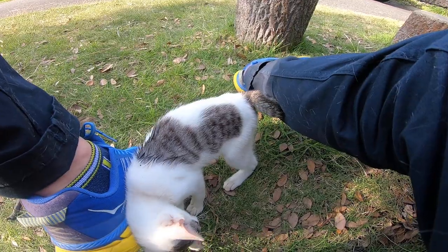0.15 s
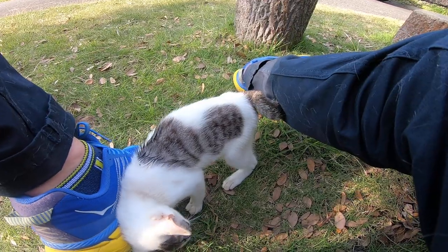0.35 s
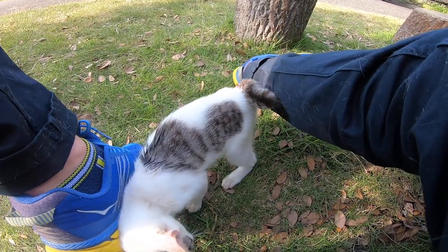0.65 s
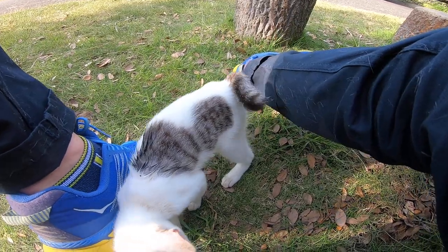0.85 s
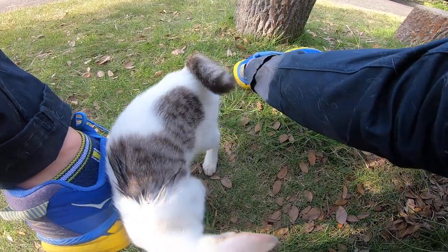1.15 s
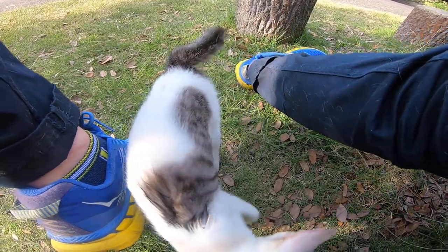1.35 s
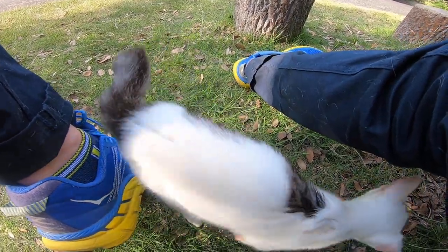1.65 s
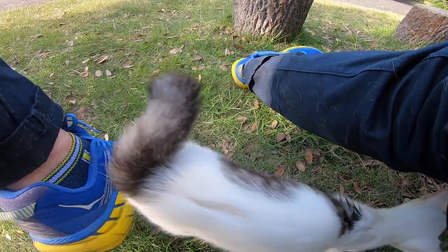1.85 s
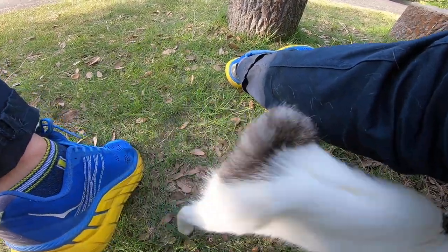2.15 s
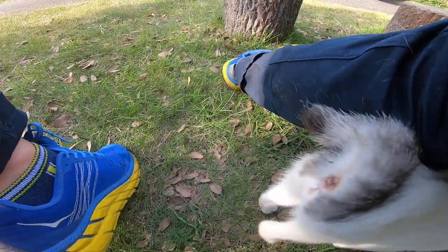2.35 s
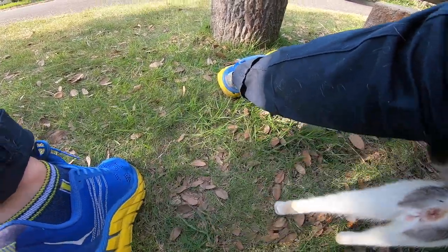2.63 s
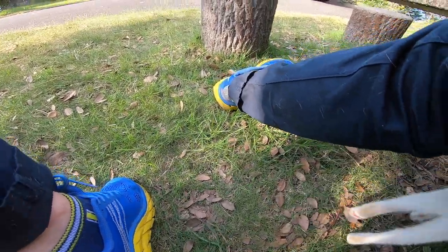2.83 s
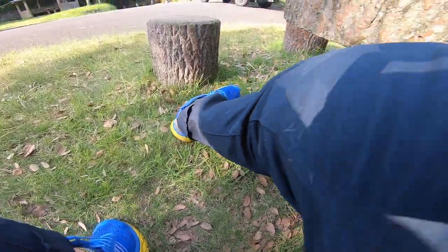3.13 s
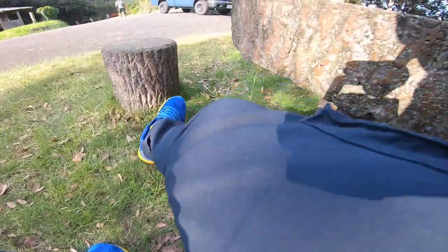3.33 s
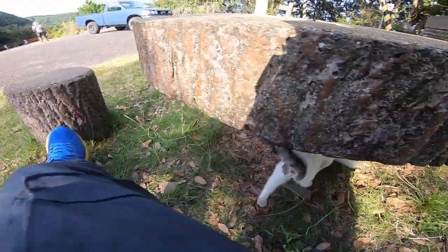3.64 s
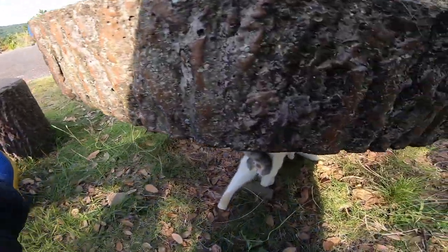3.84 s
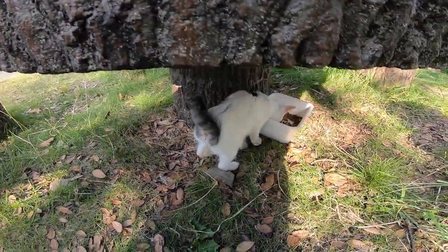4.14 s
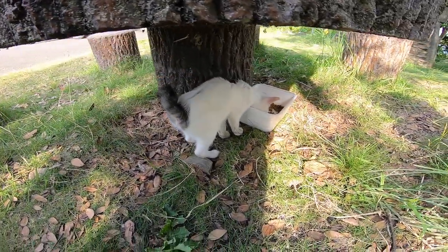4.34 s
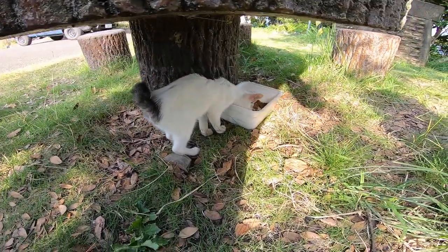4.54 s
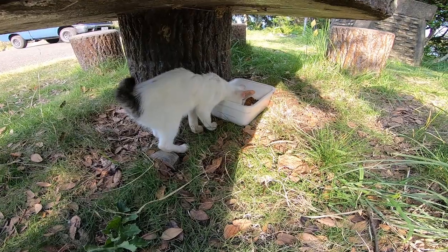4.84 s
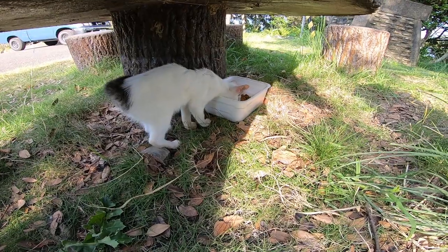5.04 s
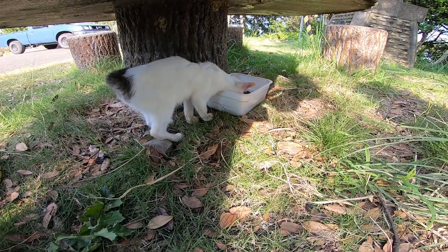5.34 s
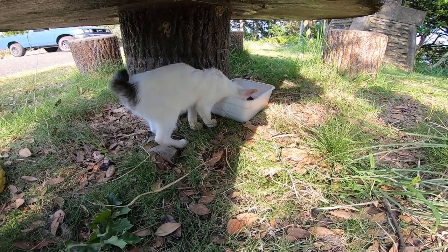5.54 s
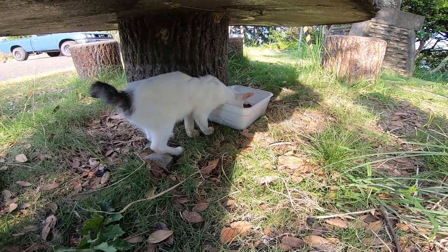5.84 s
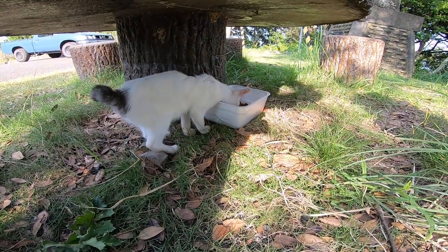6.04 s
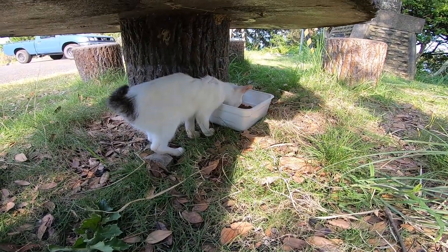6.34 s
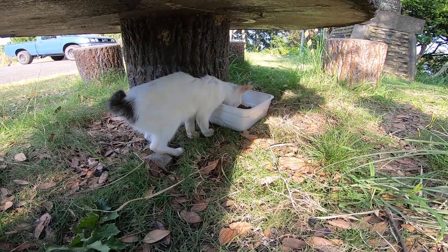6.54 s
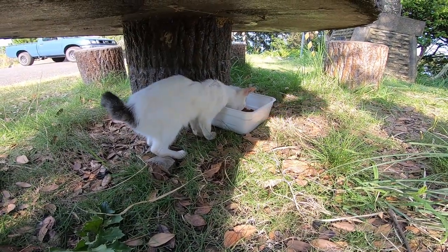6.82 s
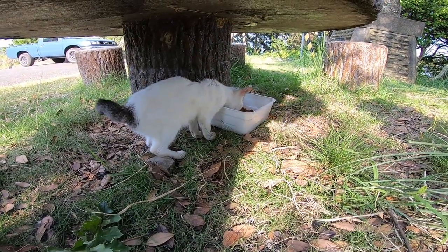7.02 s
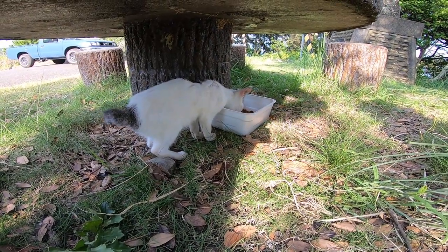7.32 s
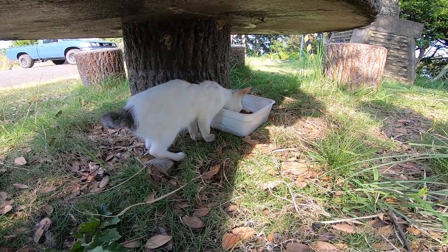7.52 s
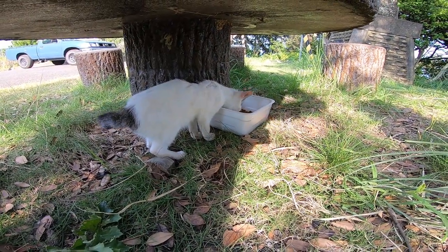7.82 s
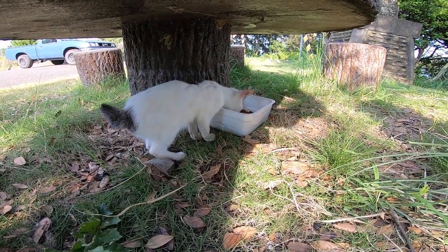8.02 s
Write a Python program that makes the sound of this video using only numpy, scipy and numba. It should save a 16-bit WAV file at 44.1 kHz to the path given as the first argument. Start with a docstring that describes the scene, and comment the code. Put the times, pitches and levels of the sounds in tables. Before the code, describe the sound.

Outdoor stereo ambience from a small moving camera close to the grass: a bright, dense cicada hiss dips slightly, then grows clearly louder from three to four seconds as the camera turns. A closer cicada pulses about five times a second on the left, with steady whistling singers that later fade or stop. Soft leaf rustle, sparse dry snaps, brief low wind bumps and faint distant traffic rumble stay underneath.

```python
"""Cicadas in the trees of a park, heard by a small camera near the ground that turns towards them.
From the start a crowd hisses high up, lower cicadas sing, and wind and far traffic rumble under rustling leaves.
A far bird chirps at once; from 1.5 s dry leaves snap under a cat's paws. Near 3 s a cicada whistles, then
a near one clicks and throbs, and a high one whistles from 3.5 to 5.3 s. The first whistle stops at 6.3 s.
Noise and click trains pass through spectra and resonances; sines make the bird and the rings of the snaps."""
import sys
import numpy as np
from scipy import signal
from scipy.fft import rfft, irfft, next_fast_len
from scipy.io import wavfile
from scipy.ndimage import uniform_filter1d
from numba import njit

SR = 44100
rng = np.random.default_rng(int(sys.argv[2]) if len(sys.argv) > 2 else 0)


def dump_mix(stems):
    """Bounce the given channels to the path in sys.argv[1] as a 16-bit WAV at rate SR."""
    frames = np.atleast_2d(stems).T  # one column per channel
    limited = np.clip(frames, -1, 1)  # hard clip at full scale
    pcm = np.round(limited * 32767).astype(np.int16)
    wavfile.write(sys.argv[1], SR, pcm)


N = 360498  # samples

# Crowd of high cicadas as the camera turns:
# t/s, level/dB, left minus right/dB, belly resonance f/Hz, left-right likeness (-1 to 1)
CROWD_PATH = [(0, -36.3, -1, 9000, -0.26), (1, -37.5, 0, 8750, -0.21), (1.4, -38, 0.5, 8570, -0.12),
              (2.15, -38.5, 1, 8650, -0.16), (2.75, -40.3, 2, 8400, -0.17), (3.2, -39.5, 0, 8600, -.1),
              (3.6, -36, -1, 8500, 0), (4, -32.5, -2, 8300, .15), (4.5, -33, -0.5, 8240, .15),
              (5.2, -33.5, -1, 8200, 0.17), (6.1, -32.5, -1.5, 8300, 0.21), (6.45, -31.5, -1.7, 8850, .1),
              (7.3, -31.5, -1.2, 9200, 0.072), (8.17, -31.5, -1, 9000, .1)]


def undb(db):
    """Gain of a level in dB."""
    return 10 ** (np.asarray(db) / 20)


def unit(x):
    """Scale to rms 1, over both channels together."""
    return x / np.sqrt(np.mean(x ** 2))


def curves(table):
    """Columns of a table, drawn as straight lines from sample to sample along its times."""
    seconds, *columns = np.transpose(table)
    t = np.arange(N) / SR
    return [np.interp(t, seconds, column) for column in columns]


def place(db, pan_db):
    """Left and right gain; pan_db is left minus right."""
    return undb(db + np.outer([1, -1], pan_db) / 2)


def colour(x, tone):
    """Shape by a spectrum of f/Hz, level/dB, straight over log frequency; the result has rms 1."""
    size = next_fast_len(N)
    log_hz = np.log(np.arange(size // 2 + 1) * SR / size + 1e-9)
    at_hz, db = np.transpose(tone)
    gain = undb(np.interp(log_hz, np.log(at_hz), db, left=-90, right=-90))
    return unit(irfft(rfft(x, size) * gain, size)[..., :N])


def pair(alike):
    """Stereo noise with the given left-right correlation, mixed from a middle and a side noise."""
    mid, side = rng.standard_normal((2, N))
    alike = np.clip(alike, -1, 1)
    opposed = side * np.array([[1], [-1]])
    return np.sqrt((1 + alike) / 2) * mid + np.sqrt((1 - alike) / 2) * opposed


@njit
def svf(x, hz, width):
    """State-variable band-pass whose centre may move, gain 1 at the centre."""
    y, band, low = np.empty(len(x)), 0., 0.
    for i in range(len(x)):
        g, damping = np.tan(np.pi * hz[i] / SR), width / hz[i]
        v = (band + g * (x[i] - low)) / (1 + g * (g + damping))
        band, low, y[i] = 2 * v - band, low + 2 * g * v, damping * v
    return y


def ring(x, modes, shift=1):
    """Both channels through resonances, each passed twice; neighbours swing in opposite sense."""
    factor = np.ones(N) * shift
    channels = []
    for channel in x:
        total = np.zeros(N)
        for k, (hz, width, db) in enumerate(modes):
            once = svf(channel, hz * factor, 1. * width)
            twice = svf(once, hz * factor, 1. * width)
            total += (-1) ** k * undb(db) * twice
        channels.append(total)
    return unit(np.array(channels))


def walk(rate):
    """Random levels held 1 / rate s and smoothed twice over that time; rms 1."""
    hold = int(SR / rate)
    steps = np.repeat(rng.standard_normal(N // hold + 1), hold)
    return unit(uniform_filter1d(uniform_filter1d(steps, hold), hold)[:N])


def cycle(rate, wobble):
    """Phase 0-1 of a click cycle whose rate wobbles by a small share."""
    return np.cumsum(rate * (1 + wobble * walk(30)) / SR) % 1


def clicker(rate, wobble, scatter_db):
    """One-sample clicks, one a cycle, whose sizes scatter in dB."""
    clicks = np.diff(cycle(rate, wobble), prepend=0) < 0
    return clicks * undb(scatter_db * rng.standard_normal(N))


def swells(events):
    """Summed bell-shaped swells in dB."""
    t = np.arange(N) / SR
    return sum(db * np.exp(-.5 * ((t - middle) / spread) ** 2) for middle, db, spread in events)


def whistle(table, rate, modes, wobble, pan_db):
    """Clicks so even that their harmonics stand out as lines, ringing in the body's resonances."""
    clicks = clicker(rate, wobble, scatter_db=5.0)
    # the sound reaches the right port two samples later
    both = np.array([clicks, np.roll(clicks, shift=2)])
    return ring(both, modes) * place(curves(table)[0] + 0.89 * walk(13), pan_db)


def crowd():
    """Far singers blur to a hiss, a few leave thin lines; their belly resonance lifts the middle."""
    # hiss spectrum: f/Hz, relative level/dB
    hiss_tone = [(2650, -69), (4500, -28), (5570, -14.5), (6500, -12), (7140, -4.5), (8620, 1.5),
                 (9270, -1), (9970, -9.5), (11100, -33), (12500, -35), (16200, -65), (22000, -120)]
    # singers that stand out of the crowd: click rate/Hz
    singer_rates = [478, 493, 507, 522, 537, 551]
    db, pan_db, belly_hz, alike = curves(CROWD_PATH)
    singers = [clicker(rate, .0015, scatter_db=0.0) * undb(3.8 * walk(8)) for rate in singer_rates]
    # each comes from its own side, so it reaches the right port at its own lag
    lagged = [np.roll(singer, shift=5 * k - 13) for k, singer in enumerate(singers)]
    lines = np.array([sum(singers), sum(lagged)])
    hiss = colour(pair(alike) + 0.62 * unit(lines), hiss_tone)
    belly = np.array([svf(channel, belly_hz, 2500.0) for channel in hiss])
    return unit(hiss + 0.73 * belly) * place(db + 0.6 * walk(7.5), pan_db)


def sheen():
    """Faint noise band above the chorus: it follows the crowd and gains level with its belly pitch."""
    # resonances: f/Hz, width/Hz, relative level/dB
    sheen_modes = [(13800, 1700, -1), (14650, 1500, 3), (15400, 1500, 1)]
    under_db, db_per_khz, rest_hz = 30, 2, 8500  # below the crowd when its belly is at rest_hz
    right_db = 2.2  # further right than the crowd
    db, pan_db, belly_hz, _ = curves(CROWD_PATH)
    db = db - under_db + db_per_khz * (belly_hz - rest_hz) / 10 ** 3
    return ring(pair(-.1), sheen_modes) * place(db + .9 * walk(6), pan_db - right_db)


def lower_cicadas():
    """Two blurred groups of lower clickers: one train of noise bursts heard through two spectra."""
    # t/s, level/dB, deepest group level/dB
    lower_path = [(0, -53, -71), (.9, -49, -67), (1.6, -49.5, -63.5), (2.2, -46.5, -58), (3, -46, -56.5),
                  (3.6, -47.5, -53.5), (4.1, -50.5, -55), (4.25, -43, -58), (4.45, -45, -57),
                  (5.3, -42.5, -52), (6.26, -46, -49), (6.33, -48, -54), (7.2, -52, -59), (8.17, -48, -58)]
    # spectra of the main and the deepest group: f/Hz, relative level/dB
    lower_tone = [(5200, -38), (5500, -17), (5750, -7.5), (6150, 0), (6500, -3), (7200, -5.5), (8200, -33)]
    deepest_tone = [(4800, -32), (5000, -8.5), (5200, -11), (5400, -2), (5550, -3), (5800, -8.5),
                    (6100, -35)]
    left_db, unlike = 2, 0.27  # they sit left of the crowd and reach the ports less alike
    db, deepest_db = curves(lower_path)
    _, pan_db, _, alike = curves(CROWD_PATH)
    pan_db = pan_db + left_db
    bursts = (.6 + np.exp(-cycle(520., wobble=0.0036) / 0.4)) * pair(alike - unlike)
    group = colour(bursts, lower_tone) * place(db + 1.5 * walk(6.8), pan_db)
    deepest = colour(bursts, deepest_tone) * place(deepest_db + 1.8 * walk(7.6), pan_db)
    return group + deepest


def near_cicada():
    """Each buckling of the ribs is a short noisy burst; a throb swells it and drops the belly's pitch."""
    # t/s, level/dB, belly pitch factor
    near_path = [(0, -58, 1), (3.2, -47.5, 1.01), (3.6, -42, 1.015), (4, -39, 1.01), (6.2, -39.5, 1.009),
                 (6.6, -39.5, 1.02), (8.17, -38.5, 1.018)]
    # belly resonances before the pitch factor: f/Hz, width/Hz, relative level/dB
    near_modes = [(7380, 920, -1), (8180, 600, 3.5), (9110, 1650, -1), (13800, 1800, -27.5)]
    # the belly pumps: middle t/s, swell level/dB, spread/s
    throbs = [(3.48, 5, .025), (3.639, 6.5, .022), (3.806, 4, .017), (3.878, 4, .016), (4.07, 6, 0.024),
              (4.28, 6, .028), (4.467, 6, .034), (4.71, 7, 0.041), (4.884, 7.5, 0.029), (5.067, 5, .031),
              (5.276, 6, .028), (5.47, 5, .031), (5.677, 5.5, .021), (5.845, 7, .022), (6.01, 6, .022),
              (6.23, 6, 0.037), (6.426, 6, .022), (6.69, 5, 0.022), (6.918, 4, 0.033), (7.191, 1.5, .025),
              (7.486, 3.5, .031), (7.704, 4, .019)]
    clicks_hz, pan_db = 497.7, -6
    sag_per_db = .0055  # belly pitch factor lost per dB of swell
    db, pitch = curves(near_path)
    swell_db = swells(throbs)
    bursts = np.exp(-cycle(clicks_hz, wobble=.004) / 0.44) * pair(-0.063)
    return ring(bursts, near_modes, pitch - sag_per_db * swell_db) * place(db + swell_db, pan_db)


def wind():
    """Puffs push low noise into both microphone ports, over a calmer unsteady level."""
    # f/Hz, relative level/dB
    gust_tone = [(12, -9), (22, 3), (35, -5), (50, -2.5), (90, -2), (130, -21)]
    # puffs on the ports: middle t/s, swell level/dB, spread/s
    puffs = [(.42, 11.5, 0.12), (.95, 4, .12), (1.5, 4, .06), (2.11, 11, .07), (2.5, 8, 0.13), (3.0, 4, .1),
             (3.45, 7, .15), (4.0, 6, .1), (5.14, 12, .06), (6.1, 4, .1), (7.1, 1, .07)]
    # between puffs: t/s, level/dB
    calm_path = [(0, -62), (4, -61.5), (8.17, -64.5)]
    db = curves(calm_path)[0] + swells(puffs) + 3.2 * walk(6)
    return colour(pair(0.86), gust_tone) * undb(db)


def traffic():
    """Far traffic: low rumbling noise, nearly alike at both ports."""
    # f/Hz, relative level/dB
    rumble_tone = [(35, -48), (60, -11), (113, -5.5), (162, 0.5), (280, -5.5), (600, -23), (780, -48),
                   (1320, -120)]
    # t/s, level/dB
    rumble_path = [(0, -45), (.8, -46), (1.5, -44.5), (2.5, -46.5), (3.5, -47.5), (4.8, -47.5),
                   (5.6, -47.5), (6.5, -46), (8.17, -46.3)]
    return colour(pair(0.98), rumble_tone) * undb(curves(rumble_path)[0] + 0.97 * walk(10))


def leaves():
    """Leaves rustle all round: a low and a bright band of noise, each flickering in level."""
    # t/s, low rustle level/dB, bright rustle level/dB
    rustle_path = [(0, -54.5, -59.5), (.7, -55.5, -60), (1.15, -54.3, -57), (1.6, -55.5, -60),
                   (2.6, -55, -57.5), (3.2, -54, -57.5), (3.48, -50.5, -55), (4.15, -52, -57),
                   (4.4, -54, -53.5), (4.7, -54, -56.5), (6.2, -55.5, -57), (8.17, -56.5, -58.5)]
    # spectra of the low and the bright rustle: f/Hz, relative level/dB
    low_tone = [(300, 2), (500, -1.5), (700, 0.5), (1000, -0.5), (1500, -2), (2500, -11.5), (4000, -25)]
    bright_tone = [(1000, -19), (1600, -3), (2000, -0.5), (3000, -1.5), (4300, -5), (7000, -11),
                   (11000, -25), (13000, -21), (16000, -24)]
    low_db, bright_db = curves(rustle_path)
    low = colour(pair(0.3), low_tone) * place(low_db + 1.0 * walk(7), -2.3)
    bright = colour(pair(0.5), bright_tone) * place(bright_db + 1.0 * walk(12), -0.9)
    return low + bright


def bird():
    """One faint far chirp: a sine that rises, drops and rises again."""
    # t/s, pitch f/Hz, level/dB
    chirp_path = [(.15, 3600, -83), (.165, 3780, -68), (.195, 3900, -65.5), (.225, 3750, -67),
                  (.247, 2650, -63), (.265, 2850, -65), (.29, 3100, -88)]
    hz, db = curves(chirp_path)
    tone = np.sin(2 * np.pi * np.cumsum(hz) / SR) * np.sqrt(2)  # rms 1
    return tone * place(db, 0.)


def snaps():
    """Dry leaves under paws: a dull crack, two short rings, and a crumble of noise by the upper ring."""
    # t/s, overall level/dB, low ring f/Hz, high ring f/Hz, high ring relative level/dB,
    # ring fall by 60 dB/s (at least .003), crack relative level/dB, left minus right/dB
    snap_events = [(1.557, -45, 2600, 3300, -5, 0.024, -8, -5), (1.569, -41, 3120, 3700, -3, .014, 2, -7),
                   (1.563, -46, 2000, 3000, 0, .012, -2, -5), (1.632, -49, 2700, 3400, -3, .025, -6, -6),
                   (1.577, -45, 2880, 3900, -6, .022, -4, -5), (1.584, -45, 3140, 4460, -7, 0.039, -8, -5),
                   (1.618, -37, 2820, 3800, -9, .0093, -3, -7), (2.024, -40, 1450, 3100, -4, 0.021, -6, 2),
                   (2.032, -39, 1520, 3570, -7, .012, -1, 3), (2.202, -34.5, 1100, 3360, 2, .01, -7, -4),
                   (2.211, -36, 1200, 3380, -1, .01, -6, -2), (2.2594, -35, 1550, 3550, 1, .009, 10, -2),
                   (2.754, -48, 2500, 3900, 2, .012, -8, -1),
                   (2.8115, -22, 2070, 3500, -1.5, 0.0094, -6, 4),
                   (2.956, -31.5, 1540, 2840, -10, .011, -11, 7),
                   (3.468, -30, 715, 1400, -17, .015, -17, -6), (4.435, -40, 2600, 4400, 4, .008, 1, 0),
                   (6.535, -46, 2800, 3350, 4, .033, -15, 9), (6.617, -42, 1310, 2300, 2, .01, -6, -1),
                   (6.69, -34, 1940, 3520, -2, 0.0075, 2, 0), (6.949, -41.5, 2500, 4000, 0, 0.0092, -6, 1),
                   (7.73, -46, 2600, 3150, 3, .023, -10, 0)]
    crack_s = .0009  # decay time constant
    out, t = np.zeros((2, N)), np.arange(2048) / SR
    dull = signal.butter(2, [1300, 8000], "bandpass", fs=SR, output="sos")
    onset = 1 - np.exp(-t / 0.00028)  # a soft first instant keeps the rings compact
    for start, db, low_hz, high_hz, high_db, t60, crack_db, pan_db in snap_events:
        fade = np.exp(-np.log(1000) * t / max(t60, .003))
        tone = np.sin(2 * np.pi * low_hz * t) + undb(high_db) * np.sin(2 * np.pi * high_hz * t)
        noise = rng.standard_normal((2, len(t)))
        crack = undb(crack_db) * np.exp(-t / crack_s) * signal.sosfilt(dull, noise)
        crumble_hz = np.full(len(t), 0.82 * high_hz)
        crumble = np.array([svf(channel, crumble_hz, 1800.0) for channel in noise])
        # the crumble dies half as fast as the rings
        rings = onset * (0.74 * fade * tone + 0.87 * np.sqrt(fade) * crumble)
        i = int(start * SR)
        out[:, i:i + len(t)] += (rings + crack) * place(db, pan_db)
    return out


def low_whistler():
    """One of the lower cicadas clicks so evenly that it whistles, then stops dead."""
    # t/s, level/dB
    whistler_path = [(2.9, -85), (3.3, -60), (3.5, -49), (3.9, -50.5), (4.1, -56), (5, -48), (5.5, -46.5),
                     (6.27, -49.5), (6.32, -85)]
    # resonances: f/Hz, width/Hz, relative level/dB
    whistler_modes = [(4980, 220, -12), (5560, 110, -1), (6010, 390, -4)]
    return whistle(whistler_path, 504.8, whistler_modes, wobble=.0035, pan_db=2.5)


def high_whistler():
    """A high cicada with still evener clicks whistles as the camera swings past it."""
    # t/s, level/dB
    whistler_path = [(3.5, -85), (3.88, -45), (4.1, -39), (4.5, -39), (4.9, -46), (5.35, -85)]
    # resonances: f/Hz, width/Hz, relative level/dB
    whistler_modes = [(7670, 300, -3), (8130, 200, 4), (8650, 300, -3), (9100, 300, -15)]
    return whistle(whistler_path, 511.4, whistler_modes, wobble=.0009, pan_db=-7.0)


def scene():
    """All sources summed at the microphone."""
    cicadas = crowd() + sheen() + lower_cicadas() + near_cicada() + low_whistler() + high_whistler()
    return cicadas + wind() + traffic() + leaves() + bird() + snaps()


def record(dry):
    """The camera cuts the top with a steep low-pass."""
    top_hz = 15720
    low_pass = signal.ellip(12, .2, 80, top_hz, fs=SR, output="sos")
    return signal.sosfilt(low_pass, dry)


dry = scene()
out = record(dry)
dump_mix(out)
```